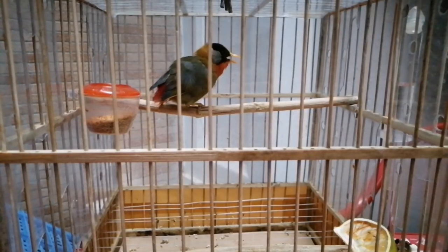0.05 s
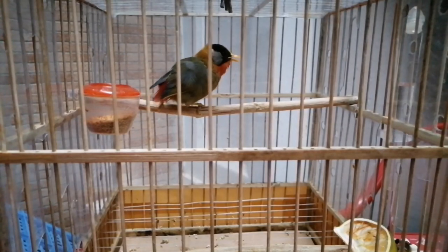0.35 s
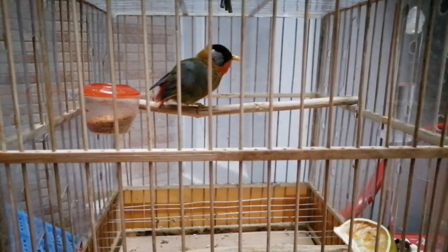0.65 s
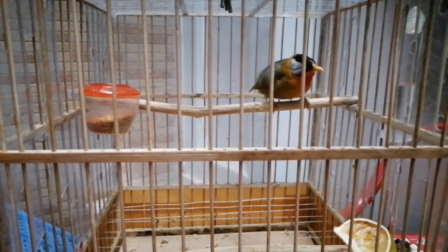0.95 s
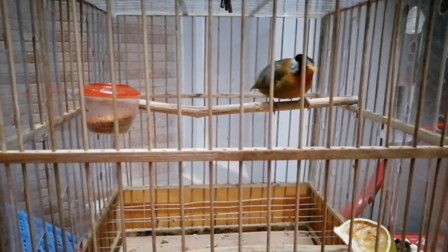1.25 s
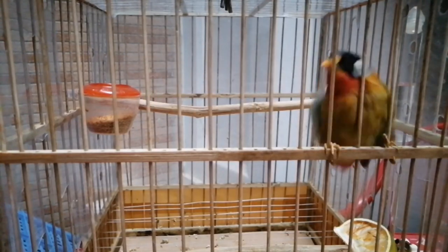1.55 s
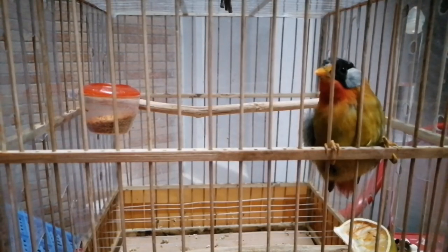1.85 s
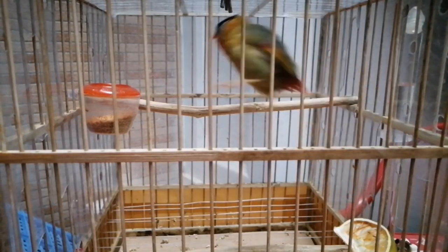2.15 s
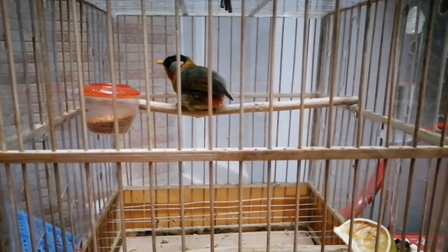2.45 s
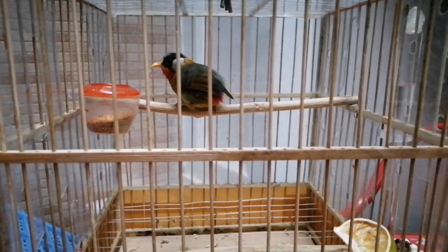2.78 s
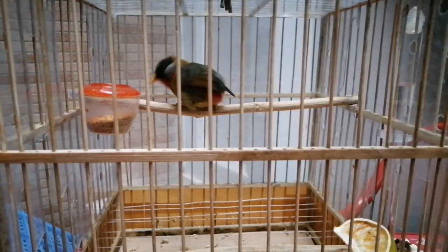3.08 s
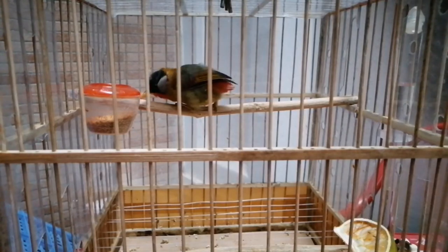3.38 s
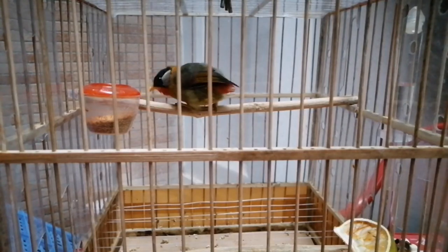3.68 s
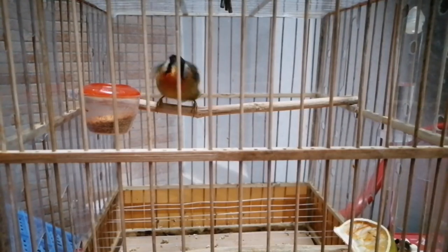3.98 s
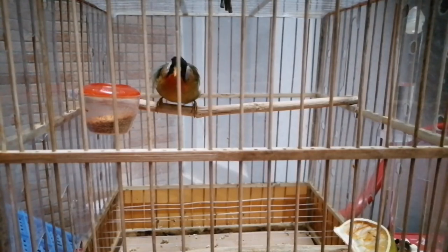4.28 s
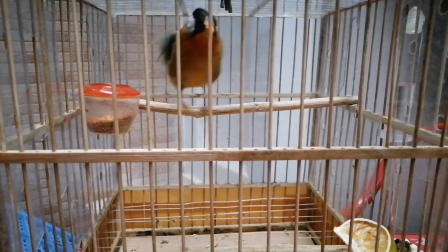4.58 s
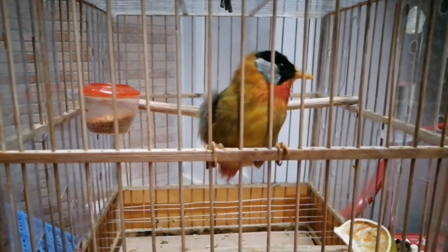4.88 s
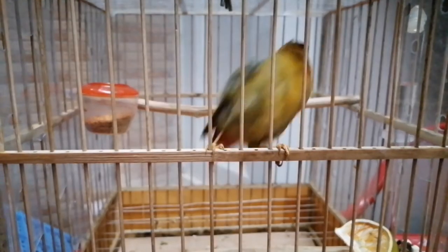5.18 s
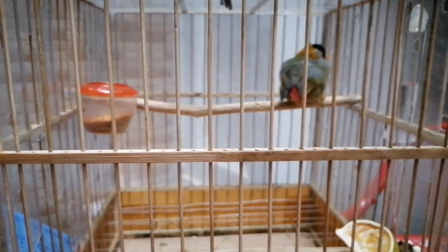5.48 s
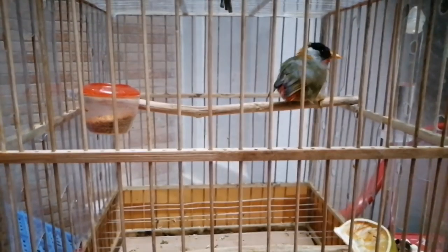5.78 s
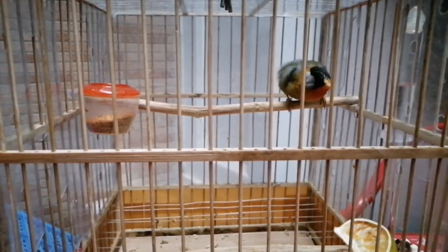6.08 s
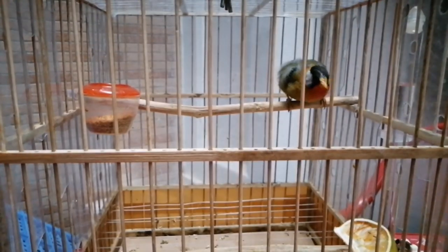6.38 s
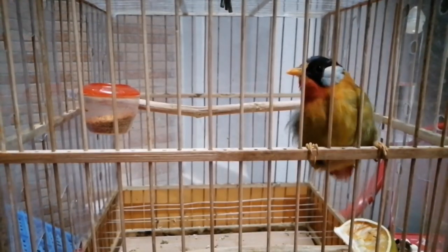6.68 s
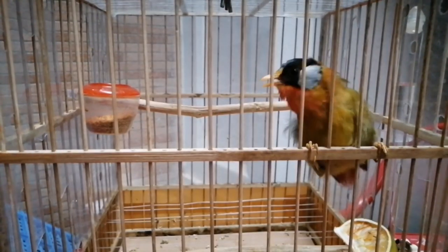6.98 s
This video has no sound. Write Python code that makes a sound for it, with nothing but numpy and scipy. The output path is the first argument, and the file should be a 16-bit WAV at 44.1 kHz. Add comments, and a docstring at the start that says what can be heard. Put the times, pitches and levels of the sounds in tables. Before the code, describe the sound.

Close sliding whistles and six sharp chirps from a small caged bird, with faint wing flutters and a distant bird in the room.

```python
"""Caged songbird, close by.

Two sliding whistles, a quavering tick, six sharp rising chirps, another tick, a last warbling whistle.
Each is a gliding syrinx tone with weak overtones, coloured by cage and walls; the room rings on.
Another bird answers from farther off. Between notes the near bird flits from perch to perch
(wing air, feathers, claws, thuds) over a low rumble."""
import sys
import numpy as np
from scipy import signal
from scipy.fft import rfft, irfft, next_fast_len
from scipy.io import wavfile
from scipy.ndimage import uniform_filter1d, minimum_filter1d, map_coordinates

SR = 44100
rng = np.random.default_rng(int(sys.argv[2]) if len(sys.argv) > 2 else 0)


def dump_mix(stems):
    """Bounce the given channels to the path in sys.argv[1] as a 16-bit WAV at rate SR."""
    frames = np.atleast_2d(stems).T  # one column per channel
    limited = np.clip(frames, -1, 1)  # hard clip at full scale
    pcm = np.round(limited * 32767).astype(np.int16)
    wavfile.write(sys.argv[1], SR, pcm)


N = 314874
TIME_S = np.arange(N) / SR

# noise colours: (frequency [Hz], relative density [dB])
HISS_SPECTRUM = [(20, -2), (70, -19), (193, -19.5), (388, -15), (574, -24.5), (1000, -28.5), (1570, -30.5),
                 (4540, -39.5), (5530, -37.5), (9500, -39), (11500, -54.5), (16000, -61.5)]
LINGER_SPECTRUM = [(1900, -45), (2300, -9), (2700, -4.5), (2930, -1.5), (3150, -34.5), (4000, -70)]
WHIRR_SPECTRUM = [(40, -4), (90, 2.5), (130, 0), (190, 2), (260, -5), (340, 0), (480, -17), (800, -41.5),
                  (4000, -88.5)]
SWISH_SPECTRUM = [(200, -28.5), (450, 2), (580, 0.5), (680, 2.5), (890, -0.5), (1020, 1.5), (1250, -7),
                  (2200, -6), (4000, -12), (9000, -26.5), (13000, -63)]
FEATHER_SPECTRUM = [(600, -14), (1500, -5.5), (2900, -5.5), (3500, 6), (4100, 2.5), (4850, -1.5),
                    (5500, -5), (9500, -12), (11500, -21.5), (16000, -25.5)]  # coloured by the bars
RASP_SPECTRUM = [(600, -30.5), (1400, -18.5), (2400, 5), (3900, -0.5), (5000, -26.5), (8000, -26.5),
                 (14000, -36)]
SNAP_SPECTRUM = [(300, -11), (1500, -18), (4000, -4.5), (7000, -4.5), (9500, 7), (12000, -3), (15000, -13)]
# near reflections: (delay [s], gain)
REFLECTIONS = [(.0021, 0.039), (.0037, -0.42), (.0058, 0.27), (.0086, -.06), (.0105, 0.13)]
# room decay: (frequency [Hz], T60 [s])
ROOM_DECAY = [(500, 0.55), (2500, 0.46), (4500, 0.43), (10000, 0.73)]
# colour of room tail and of overtones: (frequency [Hz], gain [dB])
ROOM_EQ = [(500, -5.5), (1800, -2.5), (2800, 1), (3700, -2), (4600, 3.5), (6200, 0), (8000, -1.5),
           (11500, -5.5), (14000, -8)]
BEAK_EQ = [(3200, 20), (4000, 11.5), (4800, 2), (5700, -6.5), (6600, -10.5), (7500, -5.5), (9000, -4),
           (11500, -7), (13300, -8), (14150, -3), (15000, -7)]
# far bird, and at the very start the fading end of a near whistle just before: (start [s], length [s], first
# pitch [Hz], middle pitch [Hz], last pitch [Hz], level [dB])
FAR_SLURS = [(.01, .13, 2915, 2877, 2862, -27), (.02, 0.1, 3450, 3480, 3460, -40),
             (2.919, .12, 3454, 2500, 2400, -53.5), (3.376, .13, 3710, 2713, 2390, -38.5),
             (3.479, .09, 2467, 2560, 2683, -30), (3.54, 0.12, 2650, 2878, 2944, -37),
             (5.059, .17, 3030, 2600, 2170, -34.5), (6.251, .2, 3596, 3273, 2840, -48.5),
             (6.666, 0.18, 2470, 2650, 2965, -36.5)]
# air moved by the bird: (peak time [s], sigma [s], whirr [dB], swish [dB])
FLITS = [(.12, 0.066, -49.5, -45), (.56, 0.084, -45, -44.5), (.83, .13, -44, -44.5),
         (1.17, 0.064, -49.5, -46.5), (1.68, 0.085, -48.5, -50.5), (1.96, 0.076, -51.5, -51.5),
         (2.32, 0.041, -49, -49), (2.54, .05, -51.5, -60), (3.25, 0.052, -51, -56),
         (3.63, 0.091, -45.5, -52.5), (4.29, 0.12, -45.5, -54), (5.2, 0.33, -45.5, -49.5),
         (5.48, .09, -46.5, -63.5), (5.99, 0.06, -45, -63), (6.72, 0.14, -46, -50)]
# feathers: (peak time [s], sigma [s], level [dB], tilt [dB/octave])
RUSTLES = [(0.848, 0.12, -54.5, -1), (1.297, 0.13, -59, -3), (1.597, 0.02, -69, 7), (1.742, .04, -57, 1),
           (1.919, 0.058, -52.5, 3), (2.214, .012, -53.5, 9), (2.344, .029, -52, 7.5),
           (2.519, 0.09, -61, -0.5), (5.932, 0.046, -65, 9), (6.463, 0.052, -57.5, 2.5),
           (6.73, 0.0092, -54, -7.5), (6.817, 0.051, -49.5, -2.5)]
# claw strikes; push-offs and landings: (time [s], level [dB])
CLAW_HITS = [(1.127, -55.5), (1.593, -56.5), (1.621, -54), (2.202, -51), (2.334, -49.5), (6.693, -42.5)]
THUDS = [(.759, -46.5), (.89, -46.5), (0.966, -42), (1.059, -43.5), (1.628, -43.5), (2.33, -49), (6.7, -43)]
# modes of bars; of perch and frame: (frequency [Hz], level [dB], T60 [s])
BAR_MODES = [(3380, -1, 0.1), (3820, 1, 0.033), (4760, -9, .25), (8550, -11, .04)]
PERCH_MODES = [(127.4, 5.5, 0.34), (165.5, 7, 0.18), (180, 6, 0.34), (320, -38, 0.058)]
# syrinx harmonics: (order, level [dB])
OVERTONES = [(2, -28), (3, -30), (4, -35), (5, -39), (6, -34.5), (7, -39), (8, -40.5)]
# vibrato notes: (start [s], length [s], vibrato [Hz], swing [Hz], level [dB], overtones [dB],
# tilt [dB/order], period doubling [dB])
TICKS = [(3.182, 0.035, 54, 640, -13, 3.5, -1.5, -22), (6.499, 0.039, 60, 461, -10.5, 9.5, -7.5, -25.5)]
# turning points, one list per whistle: (time [s], pitch [Hz])
WHISTLE_TURNS = [
    [(.156, 3110), (.194, 2570), (.243, 1740), (.28, 2990), (.309, 2270), (.343, 2810), (.371, 2770)],
    [(.476, 2980), (.519, 1945), (.553, 2370), (.59, 2390), (.733, 1505)],
    [(7.019, 2490), (7.044, 2323), (7.057, 2450), (7.069, 2760), (7.08, 2710), (7.101, 2295), (7.134, 2390)],
]
# per whistle: (effort [dB], pitch push [dB/kHz], attack [s], release [s], overtones [dB], tilt [dB/order])
WHISTLE_VOICING = [(-9, 7, 0.01, 0.039, 2.5, -1.3), (-9, -1, 0.0088, 0.086, 5.5, 1),
                   (-7.5, 1, 0.035, 0.037, -0.5, 0.25)]
# loudness against pitch: (pitch [Hz], gain [dB])
WHISTLE_THROAT = [(1500, -17.5), (1750, -13), (2000, -5.5), (2350, -2), (2600, -4), (3000, -2.5)]
CHIRP_THROAT = [(1800, -22), (2600, -17), (3300, -4), (3750, 2), (4100, -1), (4600, -6.5), (5300, -7.5),
                (6000, -8), (6400, -9)]
# rising chirps: (start [s], flick delay [s], climb [Hz/s], crest [Hz], effort [dB], flick boost [dB],
# overtones [dB], thump [dB])
CHIRPS = [(4.022, .048, 14480, 548, 1, 0.5, 0.5, -35.5), (4.478, .046, 15960, 476, 0.5, 1.5, 2.5, -36.5),
          (4.624, .042, 20000, 148.1, 0, -2, 6, -25), (4.769, .042, 22700, 100.6, 0.5, 0, 3.5, -23.5),
          (5.010, .044, 17750, 204.4, 3, 3, 1.5, -38.5), (5.328, .045, 15500, 467.8, -3.5, 3.5, 3, -36.5)]

BAND_LIMIT_HZ = 15850
BEAMING_HZ = 6200  # above this the beak beams past near surfaces
LINGER_DB, LINGER_T60_S = -26.5, 0.36
IDLE_WHIRR_DB, IDLE_SWISH_DB, WINGBEAT_HZ = -56, -58, 23.3
FADE_DB, STRAIN_JITTER = 20, 4
TICK_HZ, TICK_DIP_DB, TICK_ATTACK_S, TICK_RELEASE_S = 2840, 8, 0.035, .012
CHIRP_LEAD_S, CHIRP_TAIL_S, CHIRP_ATTACK_S, CHIRP_RELEASE_S = 0.0036, .016, 0.0088, .02
PLATEAU_HZ, SCOOP_HZ, SCOOP_AT_S, SCOOP_S = 3351, 1615, 0.0042, 0.0028
CREST_LEAD_S, CREST_S = .0065, 0.0031
FLICK_TOP_HZ, FLICK_S, SNAP_DB, SNAP_S = 6445, .002, -25.5, .005


def amp(db):
    """Decibels to gain."""
    return 10 ** (np.asarray(db) / 20)


def unit_rms(x):
    """Scale to rms 1."""
    return x / np.sqrt(np.mean(x ** 2) + 1e-20)


def along(points, hz):
    """Interpolate (frequency [Hz], value) points on a log axis."""
    knots_hz, values = np.transpose(points)
    return np.interp(np.log(hz + 1), np.log(knots_hz + 1), values)


def wobble(rate_hz, size):
    """Smooth random curve with knots at rate_hz."""
    knots = rng.standard_normal(size // 8 + 4)
    return map_coordinates(knots, [np.arange(size) * rate_hz / SR], mode="mirror")


def filtered(x, response):
    """Apply a frequency response."""
    size = next_fast_len(N + SR // 4)
    return irfft(rfft(x, size) * response(np.fft.rfftfreq(size, 1 / SR)), size)[:N]


def noise(spectrum):
    """Coloured noise, rms 1."""
    return unit_rms(filtered(rng.standard_normal(N), lambda hz: amp(along(spectrum, hz))))


def add(track, start_s, sound):
    """Mix a sound into the track."""
    start = int(np.clip(round(start_s * SR), 0, N - 1))
    track[start:start + len(sound)] += sound[:N - start]


def fade_db(t, attack_s, release_s):
    """Note envelope, FADE_DB down at both ends."""
    attack = np.clip(1 - t / attack_s, 0, 1)
    release = np.clip(1 - (t[-1] - t) / release_s, 0, 1)
    return -FADE_DB * (attack ** 2 + release ** 2)


def step(t, width_s):
    """Smooth rise from 0 to 1 around t = 0."""
    return .5 + .5 * np.tanh(t / width_s / 2)


def background():
    """Quiet room hiss over an uneven deep rumble."""
    hiss = amp(-56 + 1.2 * wobble(5, N)) * noise(HISS_SPECTRUM)
    rumble_db = -52 + 2.8 * wobble(4.9, N)
    rumble = noise([(12, -22), (22, -4.5), (33, 8.5), (50, -1.5), (70, -14), (200, -38), (2000, -110)])
    return hiss + amp(rumble_db) * rumble


def lingering_ring():
    """At the start the room still rings from a whistle just ended."""
    return amp(LINGER_DB - 60 * TIME_S / LINGER_T60_S) * noise(LINGER_SPECTRUM)


def room(x):
    """Diffuse tail; each frequency decays at its own rate."""
    bins_hz, t, spectra = signal.stft(rng.standard_normal(SR), SR, nperseg=256)
    decay = amp(-60 * t / along(ROOM_DECAY, bins_hz)[:, None])
    tail = signal.istft(spectra * decay, SR, nperseg=256)[1]
    tail *= 1 - np.exp(-np.arange(len(tail)) / SR / .012)
    wet = signal.fftconvolve(x, tail / np.linalg.norm(tail))[:N]
    return filtered(wet, lambda hz: amp(along(ROOM_EQ, hz)))


def cage(x):
    """Near surfaces return delayed copies that beat against a gliding note."""
    def response(hz):
        echoes = sum(gain * np.exp(-2j * np.pi * hz * delay_s) for delay_s, gain in REFLECTIONS)
        return 1 + echoes / (1 + (hz / BEAMING_HZ) ** 4)
    return filtered(x, response)


def syrinx(glide_hz, level_db, jitter, rasp_db, overtone_db, tilt_db, doubling_db):
    """One note: membranes make a nearly pure tone; weak overtones pass through throat and beak."""
    t = np.arange(len(glide_hz)) / SR
    # fast glides make the membranes swing less regularly
    strain = uniform_filter1d(np.abs(np.gradient(glide_hz)) * SR / 150000, size=200) ** 2
    pitch_hz = glide_hz * (1 + jitter * (1 + STRAIN_JITTER * strain) * wobble(700, len(t)))
    phase = 2 * np.pi * np.cumsum(pitch_hz) / SR
    # alternating strong and weak cycles add half-order partials
    tone = np.sin(phase) + amp(doubling_db) * (np.sin(3 * phase / 2) + 0.25 * np.sin(phase / 2))
    for order, db in OVERTONES:
        partial_hz = order * glide_hz
        build_up = 1 - np.exp(-t / (.004 * (order - 1)))
        flutter_db = 2.5 * wobble(90, len(t))
        gain = amp(db + overtone_db + tilt_db * (order - 3) + along(BEAK_EQ, partial_hz) + flutter_db)
        tone += build_up * gain * (partial_hz < BAND_LIMIT_HZ) * np.sin(order * phase)
    hiss = uniform_filter1d(rng.standard_normal(len(t)), size=3)
    noise_skirt = wobble(2600, len(t)) * np.sin(phase)
    tone += amp(rasp_db) * (np.tanh(strain) + 0.013) * (noise_skirt + amp(-15.5) * hiss)
    edges = np.clip(np.minimum(t, t[-1] - t) / .003, 0, 1)
    return np.sqrt(2) * amp(level_db) * edges * tone


def far_bird():
    """Faint slurs, one pitch arc each, heard mostly in the room; the first two carry the end of a whistle that
    has just stopped, the rest come from across the room."""
    out = np.zeros(N)
    for start_s, length_s, *pitches_hz, db in FAR_SLURS:
        t = np.arange(0, length_s, 1 / SR)
        glide_hz = np.polyval(np.polyfit([0, .5, 1], pitches_hz, 2), t / length_s)
        level_db = db + fade_db(t, attack_s=0.021, release_s=0.094)
        add(out, start_s, syrinx(glide_hz, level_db, jitter=.028, rasp_db=-14.5,
                                 overtone_db=-9.5, tilt_db=-4.5, doubling_db=-60))
    return out


def wings():
    """Air swells with each flit and pulses with the wingbeat; feathers rustle on top."""
    whirr, swish = amp(IDLE_WHIRR_DB), amp(IDLE_SWISH_DB)
    for peak_s, sigma_s, whirr_db, swish_db in FLITS:
        swell = np.exp(-.5 * ((TIME_S - peak_s) / sigma_s) ** 2)
        whirr = np.hypot(whirr, amp(whirr_db) * swell)
        swish = np.hypot(swish, amp(swish_db) * swell)
    beat = np.sin(2 * np.pi * np.cumsum(WINGBEAT_HZ + 3 * wobble(1.9, N)) / SR)
    air = whirr * noise(WHIRR_SPECTRUM) + swish * noise(SWISH_SPECTRUM)
    feathers, hiss = np.zeros(N), noise(FEATHER_SPECTRUM)
    for peak_s, sigma_s, db, tilt_db in RUSTLES:
        rustle = unit_rms(filtered(hiss, lambda hz: amp(tilt_db * np.log2((hz + 300) / 4000))))
        feathers += amp(db) * np.exp(-.5 * ((TIME_S - peak_s) / sigma_s) ** 2) * rustle
    flutter_db = 1.1 * beat + 1.6 * wobble(190, N)
    return air * unit_rms(amp(1.2 * beat)) + feathers * unit_rms(amp(flutter_db))


def ring(modes, t):
    """Struck modes; strengths vary per blow."""
    return sum(amp(db + rng.normal(0, 2.5) - 60 * t / t60_s) * np.sin(2 * np.pi * hz * t)
               for hz, db, t60_s in modes)


def feet():
    """Claws click and ring the thin bars; the bird's weight thuds on the perch."""
    out, t = np.zeros(N), np.arange(SR // 2) / SR
    for start_s, db in CLAW_HITS:
        bars = ring(BAR_MODES, t)
        click = amp(-60 * t / .015) * uniform_filter1d(rng.standard_normal(len(t)), size=2)
        add(out, start_s, amp(db) * (.5 * bars + click))
    for start_s, db in THUDS:
        add(out, start_s, amp(db) * ring(PERCH_MODES, t) * (1 - np.exp(-t / 0.012)))
    return out


def thumps():
    """A soft low thump at the peak of each chirp."""
    swell = sum(amp(db) * np.exp(-((TIME_S - start_s - .034) / .014) ** 2) for start_s, *_, db in CHIRPS)
    return swell * noise([(30, 8.5), (110, 7.5), (300, -2), (900, -14.5), (2000, -38.5), (8000, -81)])


def ticks():
    """Two quick pitch swings make a harsh tick that dips at the ends of each swing."""
    out = np.zeros(N)
    for start_s, length_s, vibrato_hz, swing_hz, db, overtone_db, tilt_db, doubling_db in TICKS:
        t = np.arange(0, length_s, 1 / SR)
        swing = np.sin(2 * np.pi * vibrato_hz * t)
        level_db = db - TICK_DIP_DB * swing ** 2 + fade_db(t, TICK_ATTACK_S, TICK_RELEASE_S)
        add(out, start_s, syrinx(TICK_HZ + swing_hz * swing, level_db, jitter=.0015, rasp_db=-30,
                                 overtone_db=overtone_db, tilt_db=tilt_db, doubling_db=doubling_db))
    return out


def whistles():
    """Clean notes easing between turning pitches; loudness follows pitch."""
    out = np.zeros(N)
    for turns, voicing in zip(WHISTLE_TURNS, WHISTLE_VOICING):
        effort_db, push_db_per_khz, attack_s, release_s, overtone_db, tilt_db = voicing
        turn_s, turn_hz = np.transpose(turns)
        t = np.arange(0, turn_s[-1] - turn_s[0], 1 / SR)
        index = np.arange(len(turns))
        progress, leg = np.modf(np.interp(turn_s[0] + t, turn_s, index))
        glide_hz = np.interp(leg + np.sin(np.pi * progress / 2) ** 2, index, turn_hz)
        push_db = push_db_per_khz * (glide_hz - glide_hz.mean()) / 1000
        level_db = effort_db + push_db + along(WHISTLE_THROAT, glide_hz) + fade_db(t, attack_s, release_s)
        add(out, turn_s[0], syrinx(glide_hz, level_db, jitter=.0018, rasp_db=-27.5,
                                   overtone_db=overtone_db, tilt_db=tilt_db, doubling_db=-64))
    return out


def chirps():
    """Brief rasp, scoop, climbing plateau, small crest, then an upward flick with a snap of hiss."""
    out, rasps, snaps = np.zeros((3, N))
    for start_s, flick_s, climb_hz_per_s, crest_hz, db, flick_db, overtone_db, _ in CHIRPS:
        t = np.arange(-CHIRP_LEAD_S, flick_s + CHIRP_TAIL_S, 1 / SR)
        scoop_hz = SCOOP_HZ * step(SCOOP_AT_S - t, SCOOP_S)
        bump_hz = crest_hz * np.exp(-((t - flick_s + CREST_LEAD_S) / CREST_S) ** 2)
        plateau_hz = PLATEAU_HZ + climb_hz_per_s * t - scoop_hz + bump_hz
        flick = step(t - flick_s, FLICK_S)
        glide_hz = plateau_hz + (FLICK_TOP_HZ - plateau_hz) * flick
        level_db = db + flick_db * flick + along(CHIRP_THROAT, glide_hz)
        level_db += fade_db(t - t[0], CHIRP_ATTACK_S, CHIRP_RELEASE_S)
        add(out, start_s + t[0], syrinx(glide_hz, level_db, jitter=.004, rasp_db=-21.5,
                                        overtone_db=overtone_db, tilt_db=-3.5, doubling_db=-44))
        rasps += amp(db - 34) * np.exp(-((TIME_S - start_s) / 0.0099) ** 2)
        snaps += amp(db + flick_db / 2 + SNAP_DB) * np.exp(-((TIME_S - start_s - flick_s) / SNAP_S) ** 2)
    return out + rasps * noise(RASP_SPECTRUM) + snaps * noise(SNAP_SPECTRUM)


def scene():
    """Near bird mostly direct, far bird mostly room."""
    song, calls, far = whistles() + ticks(), chirps(), far_bird()
    movement = wings() + feet() + thumps()
    direct = cage(song + calls + amp(-13) * far)
    # the beak beams overtones, so the room gets a different balance
    spread_eq = [(3000, -1), (4000, 0), (5500, -6), (8000, 5.5), (12000, -5)]
    spread = filtered(song, lambda hz: amp(along(spread_eq, hz)))
    wet = room(amp(-13) * spread + amp(-18) * calls + amp(-5) * far)
    return (direct + wet + lingering_ring() + movement + background())[None]


def record(dry):
    """Gain control ducks at once under loud notes and recovers steadily; a band limit follows."""
    x = dry[0]
    ceiling, release_db_per_s = .8, 70
    excess_db = 20 * np.log10(np.maximum(1, np.abs(x) / ceiling))
    recovery_db = release_db_per_s * TIME_S
    duck_db = np.maximum.accumulate(excess_db + recovery_db) - recovery_db
    gain = uniform_filter1d(minimum_filter1d(amp(-duck_db), size=130), size=130)
    return filtered(x * gain, lambda hz: hz < BAND_LIMIT_HZ)[None]


dry = scene()
out = record(dry)
dump_mix(out)
```